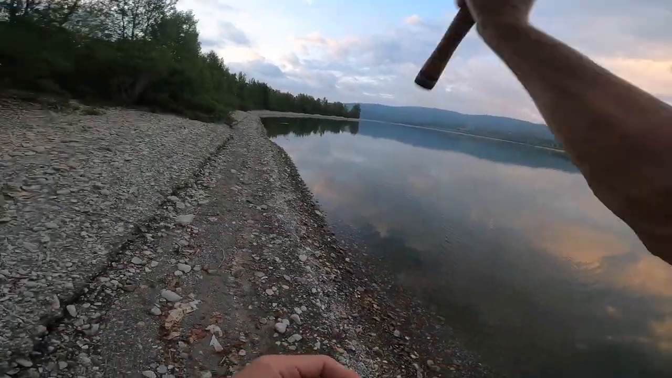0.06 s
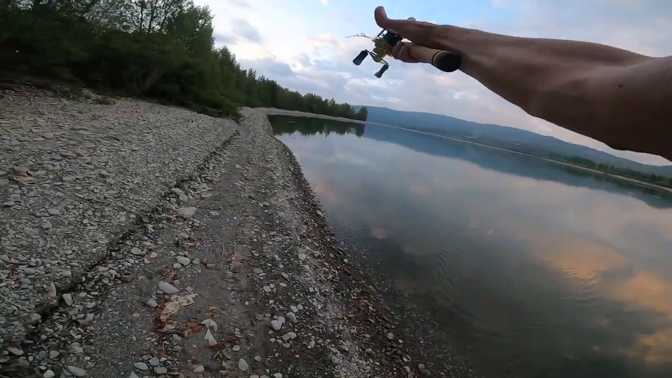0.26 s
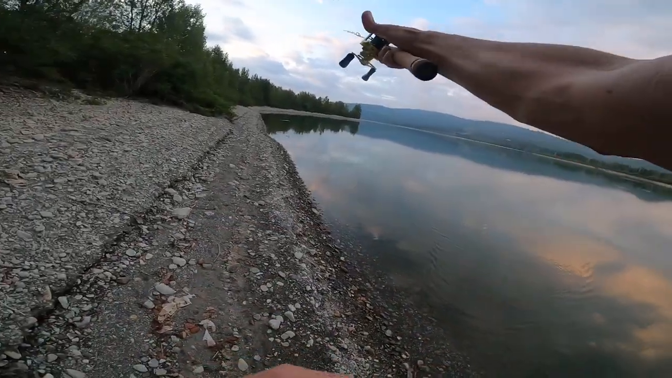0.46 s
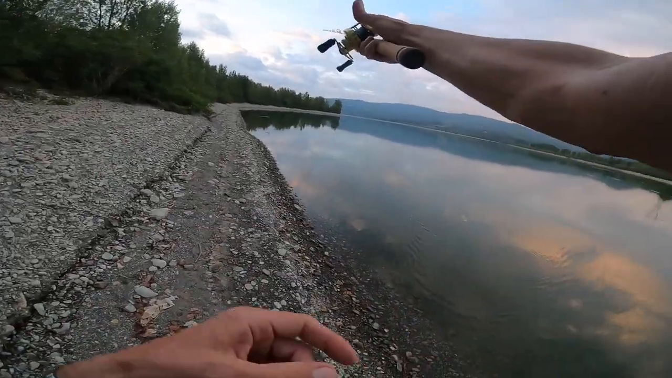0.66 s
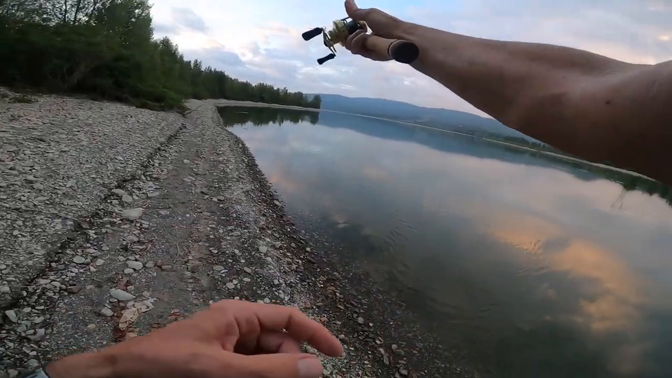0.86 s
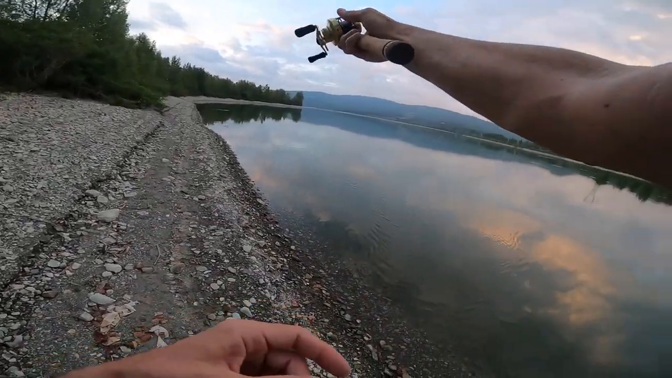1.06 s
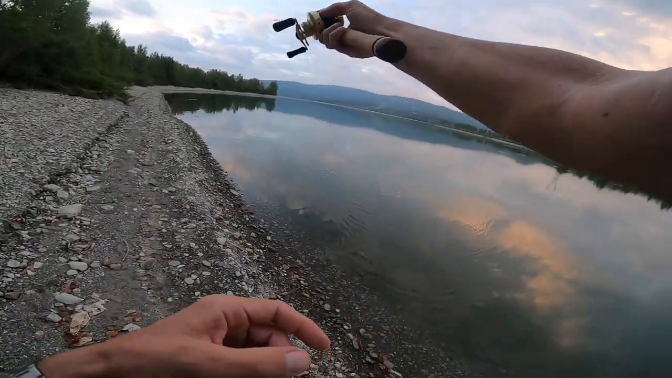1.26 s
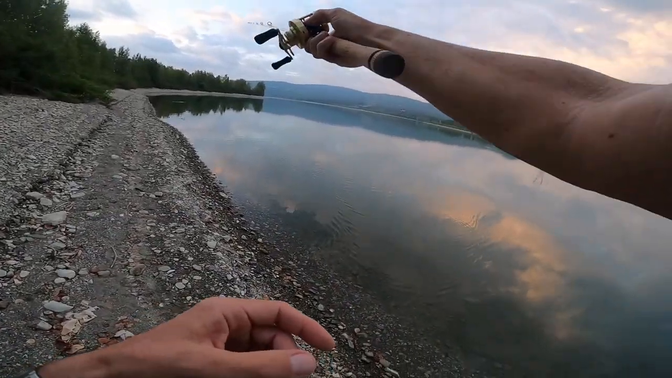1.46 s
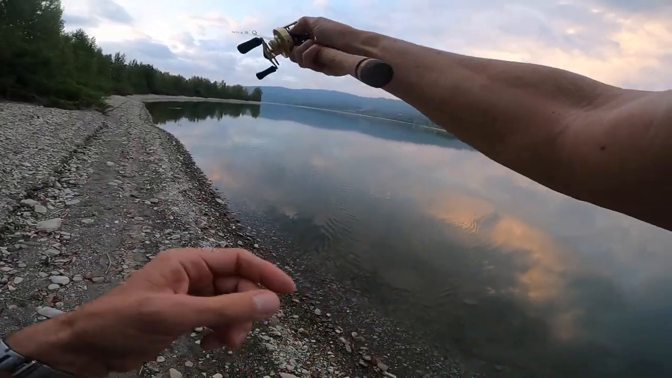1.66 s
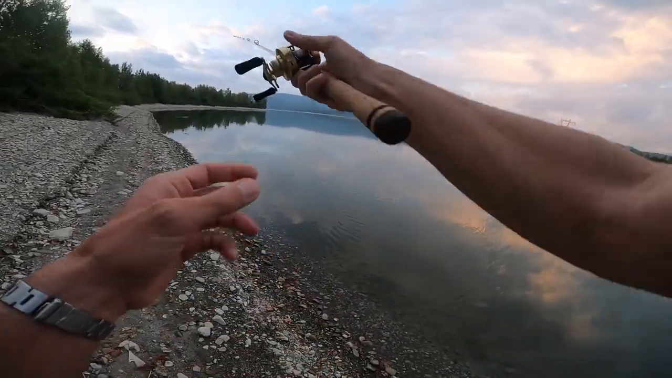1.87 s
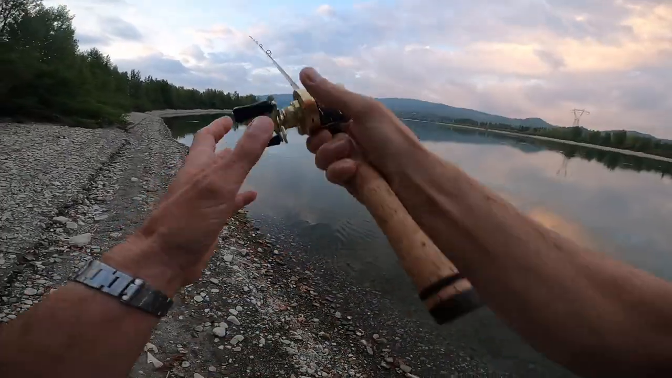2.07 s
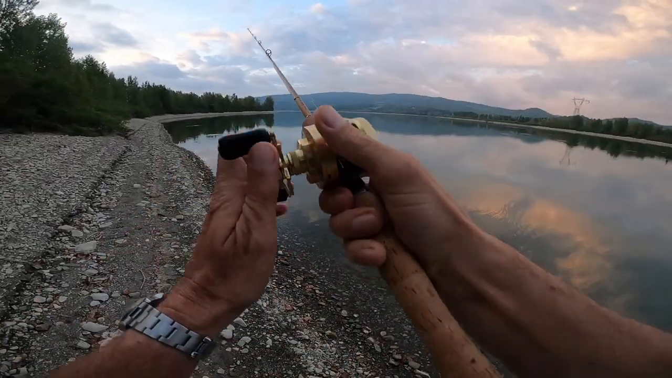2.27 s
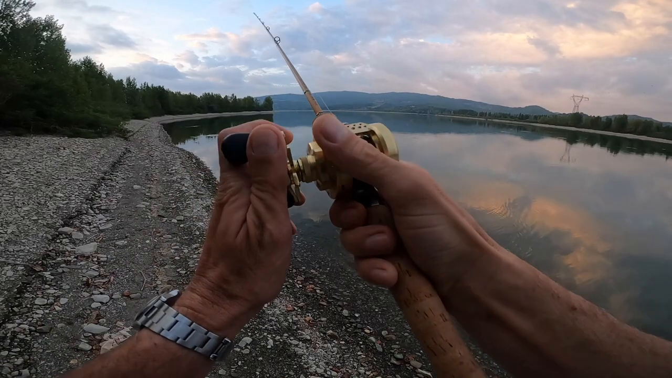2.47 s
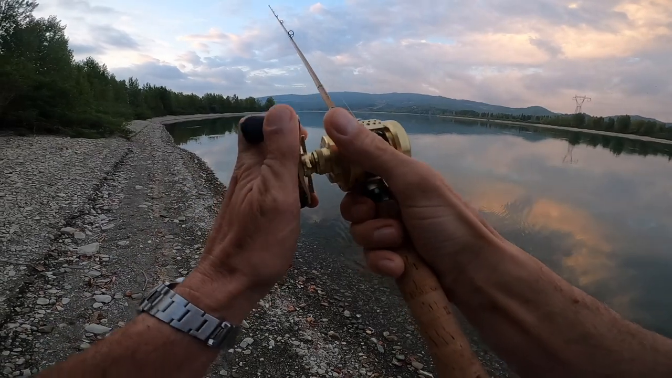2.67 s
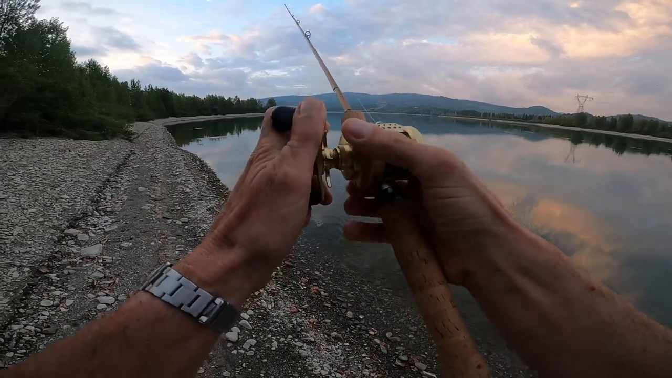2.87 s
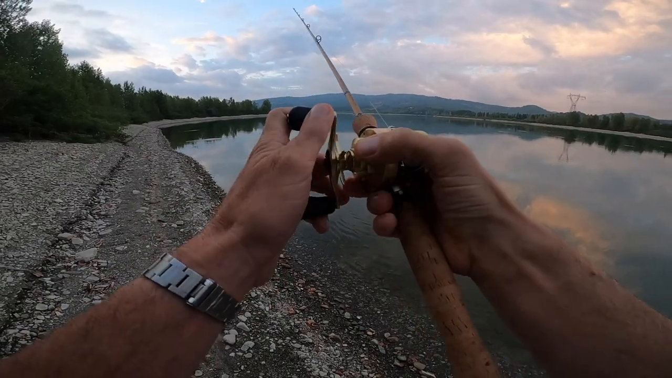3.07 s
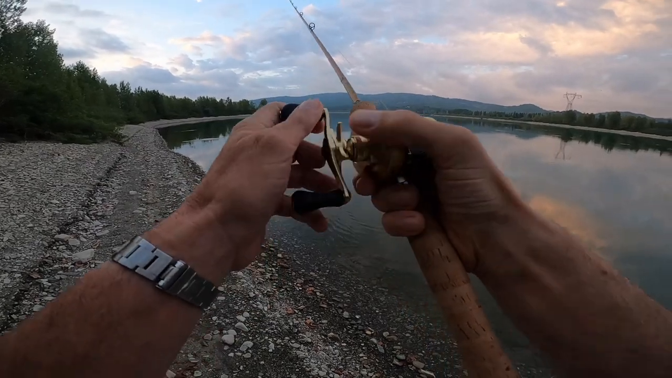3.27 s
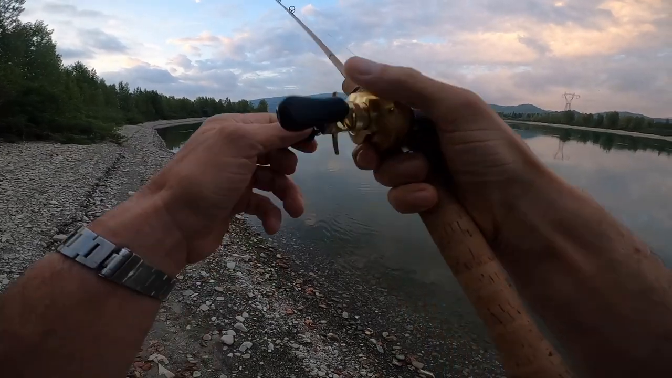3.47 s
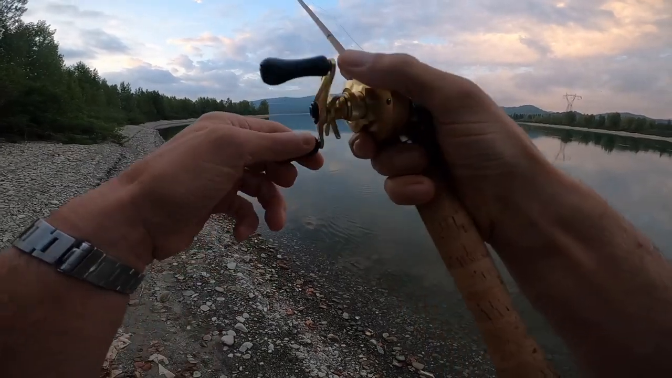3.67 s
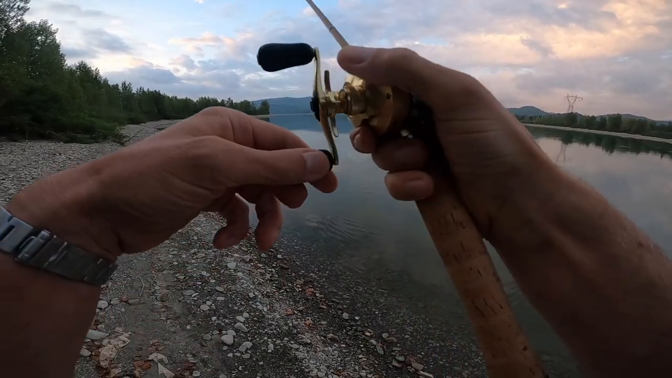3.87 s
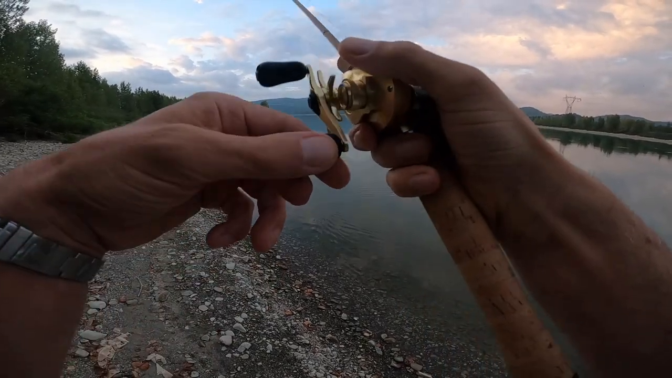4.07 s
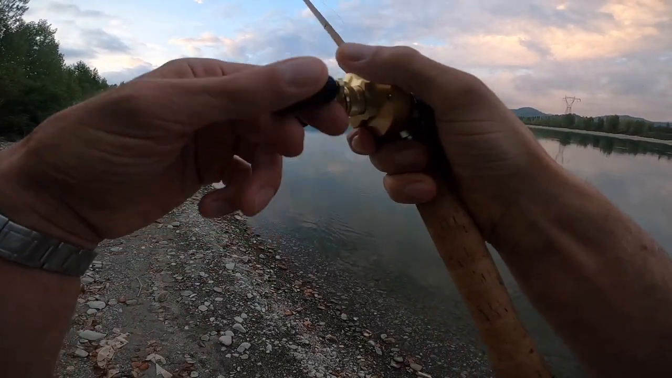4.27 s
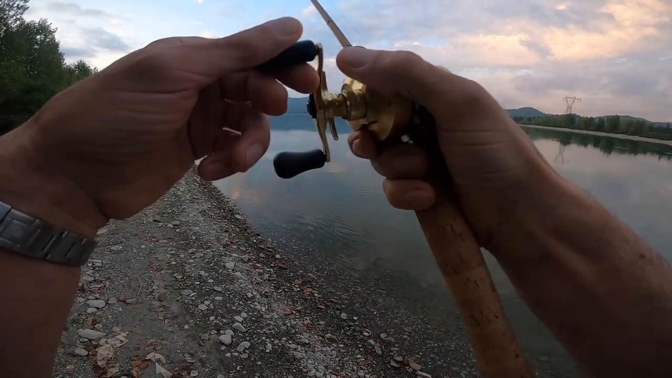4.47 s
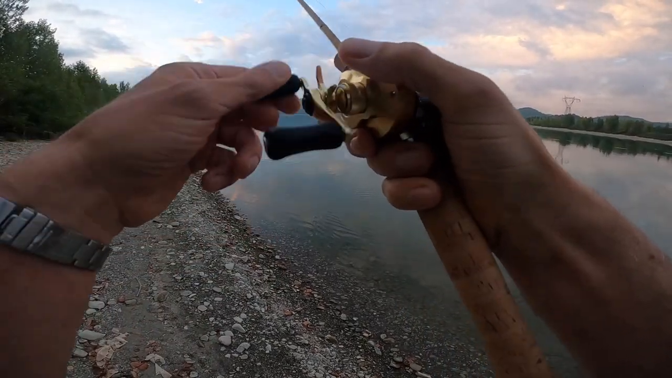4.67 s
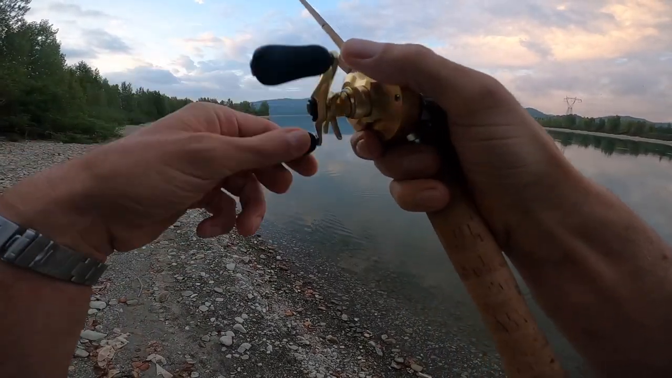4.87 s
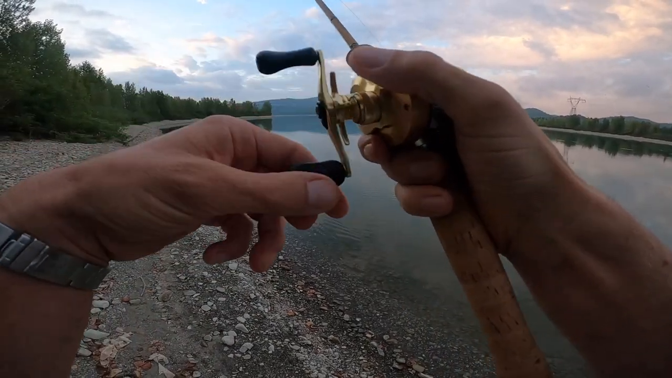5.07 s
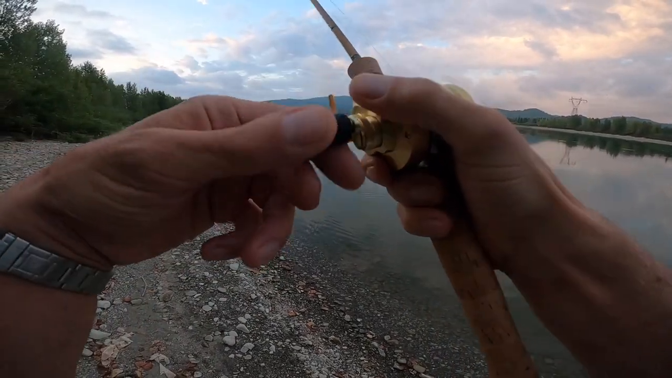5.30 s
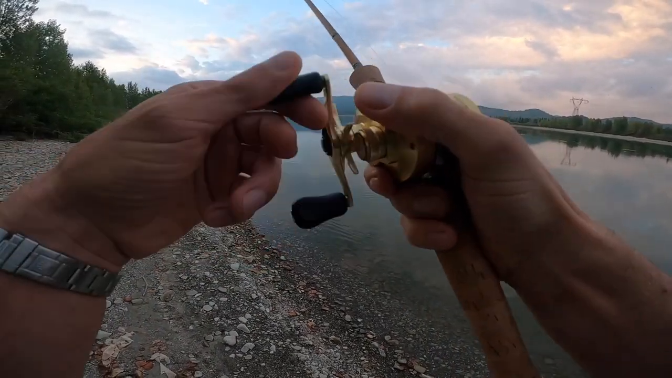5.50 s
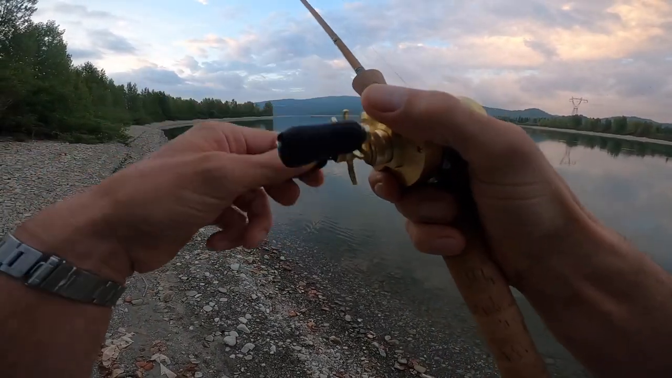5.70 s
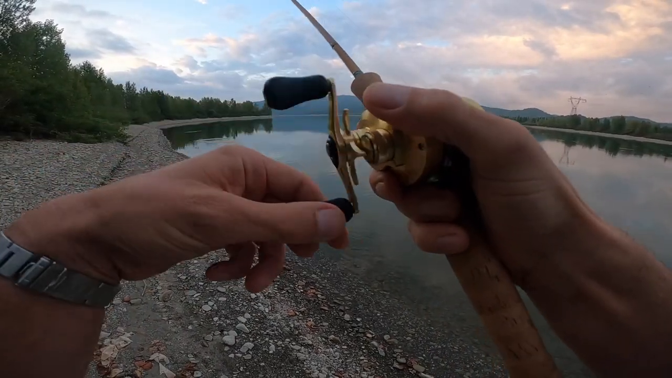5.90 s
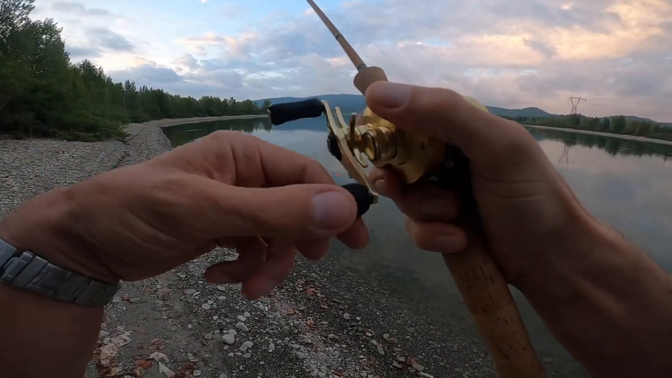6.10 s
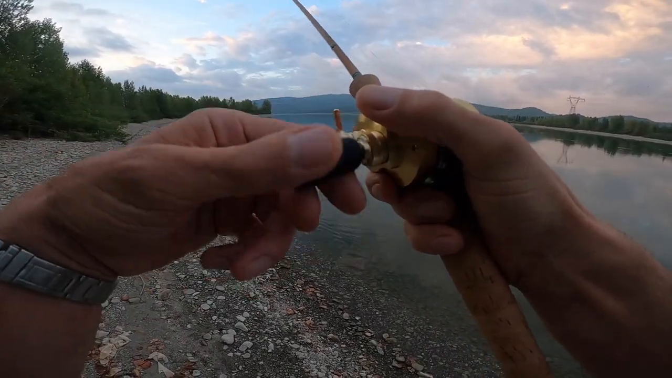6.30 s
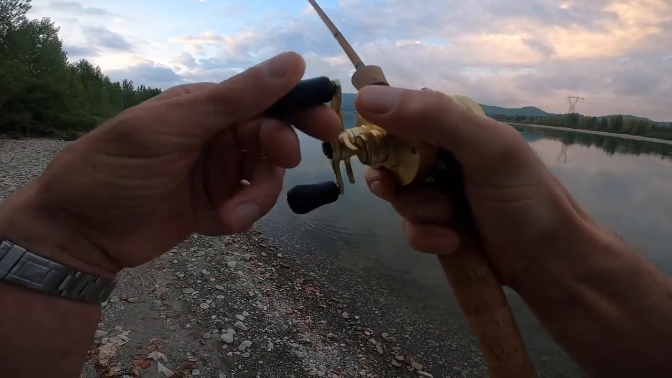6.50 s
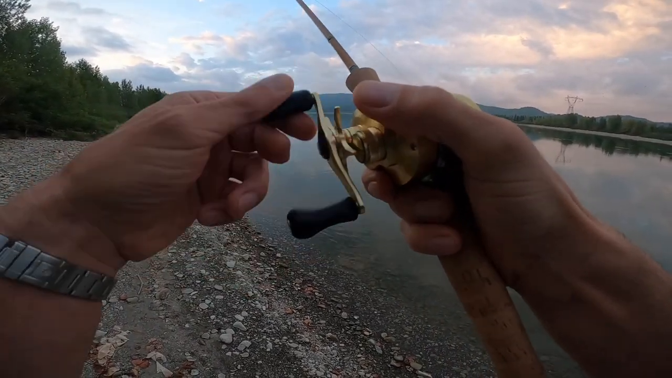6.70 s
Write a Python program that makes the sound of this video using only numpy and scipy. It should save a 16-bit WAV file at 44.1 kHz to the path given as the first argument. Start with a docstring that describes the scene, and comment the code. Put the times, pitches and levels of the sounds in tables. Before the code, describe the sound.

Close up on a calm pebble shore, a rod swishes with a knock and click, and line hisses out as the spool whirs, falling in pitch and fading over about a second and a half. Hands knock softly on the grip, metal clicks, then one loud dry snap engages the reel. Faint cranking follows, gears rubbing and wet line crackling, with small birds far off and low air rumble.

```python
"""A baitcasting reel is cast and wound close by: its free spool whirs as a comb of partials that sinks as it slows.
The rod swishes as air noise, the line hisses, and hands and metal contacts strike damped resonances.
The handle is then cranked softly: gears rub as patchy noise and wet line crackles as random grains.
Small birds call far off as gliding tones, over a low rumble of air on a calm pebble shore."""
import sys
import numpy as np
from scipy import signal
from scipy.fft import rfft, irfft, next_fast_len
from scipy.io import wavfile
from scipy.ndimage import uniform_filter1d, map_coordinates

SR = 44100
rng = np.random.default_rng(int(sys.argv[2]) if len(sys.argv) > 2 else 0)


def dump_mix(stems):
    """Bounce the given channels to the path in sys.argv[1] as a 16-bit WAV at rate SR."""
    frames = np.atleast_2d(stems).T  # one column per channel
    limited = np.clip(frames, -1, 1)  # hard clip at full scale
    pcm = np.round(limited * 32767).astype(np.int16)
    wavfile.write(sys.argv[1], SR, pcm)


N = 297507

# Levels are nominal, ahead of the balance of the two ports; spectra are relative.
# t60 is the time of a 60 dB decay.

# buffeting of air on the ports: (frequency [Hz], density [dB per Hz])
BUFFET = [(12, -14), (35, 1.5), (65, -3.5), (130, -19.5), (250, -34.5), (700, -91.5)]
# puffs of air on the ports: (middle [s], length [s], level [dB], lean to the right [dB])
PUFFS = [(0.166, 0.12, -39.5, 13), (.325, 0.19, -37.5, 8.5), (1.189, 0.23, -47.5, -0.5),
         (1.49, 0.083, -46.5, 4), (6.296, 0.079, -46.5, 3), (6.64, 0.073, -46.5, 7.5)]
# rumble of the open shore: (frequency [Hz], density [dB per Hz])
SHORE = [(50, -30), (100, -4), (200, -3), (560, -18), (880, -25.5), (1250, -20.5), (2300, -44.5),
         (5000, -79.5)]
STILL_AIR_DB, ARM_DRAUGHT_DB = -59, 11  # buffeting at rest; that of the winding arm, over the rub

# the rod's swing: (time [s], swish level [dB], line hiss level [dB])
SWING = [(.09, -63, -70), (.125, -42.5, -58.5), (.19, -41.5, -56.5), (.212, -34, -39), (.262, -34.5, -34.5),
         (.278, -51, -35.5), (.29, -55, -41), (.315, -41, -46), (.38, -53.5, -50.5)]
# swish of the rod: (frequency [Hz], density [dB per Hz])
SWISH = [(80, -10), (250, -7.5), (450, -14.5), (680, -10), (1200, -19), (2200, -20), (5000, -74)]
# hiss of line through the guides: (frequency [Hz], density [dB per Hz])
LINE = [(600, -14), (1200, -7.5), (4000, -6.5), (6200, -5.5), (8400, -27), (16000, -36)]

# dull knocks of hands on grip and knob: (time [s], nominal peak [dB], upper ring tilt [dB], rattle t60 [s])
KNOCKS = [(.037, -43, -2.5, 0.018), (.134, -26, -4.5, 0.038), (.164, -26.5, -14, 0.05),
          (.296, -16.5, -5.5, 0.018), (1.566, -41.5, -9, 0.013), (2.099, -36, -5.5, 0.069),
          (2.129, -41, -6, 0.056), (2.154, -28.5, -5.5, 0.032), (2.176, -36, -7, 0.046),
          (2.187, -35.5, -10, 0.09), (2.219, -30, -14.5, .03), (2.323, -29, -11, 0.12),
          (2.448, -35, -15.5, 0.022), (6.524, -33, 5.5, 0.16)]
# resonances of the rod and its grip: (centre [Hz], width [Hz], level [dB])
GRIP = [(293, 115, -7), (588, 93, -1.5), (702, 55, 0), (1080, 240, -6.5), (1730, 256, -1.5),
        (3600, 2650, -22)]
KNOCK_TICK_DB = -19.5  # bright tick of first contact before colouring, relative to the knock's nominal peak

# ticks of the handle in its play: (time [s], nominal peak [dB], chatter t60 [s])
HANDLE_PLAY = [(0.114, -42, 0.055), (0.496, -33, 0.032), (4.248, -45.5, 0.087), (4.795, -43.5, 0.1),
               (5.074, -44, 0.065), (5.354, -40, 0.16), (5.596, -38.5, 0.06), (5.714, -45.5, .08),
               (6.077, -45.5, 0.06)]
# ring of the handle: (frequency [Hz], density [dB per Hz])
HANDLE = [(400, -20), (1100, -3), (1450, -6.5), (1800, 0.5), (2400, -13), (7000, -37)]

# sharp metal contacts in the reel:
# (time [s], nominal peak [dB], body control [dB], treble control [dB], bounce level re contact [dB])
CLICKS = [(0.2954, -18.5, -7, -10, -23), (0.495, -25, 1, -16, -13), (1.79, -35.5, -10, 9, -9),
          (2.315, -26, 0, 5, -22), (2.3337, -17, -15, 8.5, -8), (2.6398, -14.5, -17.5, -8, -25.5),
          (2.6815, -2.5, -22.5, -25, -6.5), (2.6846, -11, -18.5, 0.5, -22), (2.8115, -37.5, 6, -16, -5),
          (2.842, -31.5, 4.5, -14, -8.5), (6.6887, -45, 10, -14.5, -23)]
# further metal contacts without a bounce, some of them part of the loud snap:
# (time [s], nominal peak [dB], treble control [dB])
SINGLE_CONTACTS = [(0.795, -44, -9), (2.540, -47, -4), (2.6341, -38, -14), (2.671, -30, -35),
                   (2.6903, -18.5, -32), (3.36, -47, 3), (4.4812, -46, 8), (4.7337, -44, -6),
                   (4.76, -45, -7)]
# modes of the reel's frame: (frequency [Hz], mean level [dB], t60 [s])
FRAME = [(2374, -10.5, 0.014), (2740, -5, 0.009), (3450, -5, 0.013), (3885, -3.5, 0.01),
         (5330, -16.5, 0.011), (6960, -17.5, 0.0077), (7370, -22, 0.022)]
# rattle of the reel's loose parts: (frequency [Hz], density [dB per Hz])
RATTLE = [(200, -15), (1200, -13.5), (2500, 1), (7200, 0), (8500, -13), (12000, -6), (15500, -31.5)]
# ringing of the rod, jolted as the gear catches: (frequency [Hz], level [dB], t60 [s])
JOLT = [(126, -35.5, 0.08), (511, -20, 0.01), (535, -38.5, 0.16), (1290, -46, .13), (11850, -55, .09)]
JOLT_AT_S, BOUNCE_S = 2.6842, 0.0108  # time of the jolt; flight of a contact's one bounce

# whir of the spool and running line: (time [s], level [dB])
SPOOL = [(.31, -50.5), (.45, -50.5), (.61, -58), (.9, -64.5), (1.1, -66.5), (1.33, -62.5), (1.66, -61.5),
         (1.8, -67.5), (1.99, -76)]
# slowing of the free spool as the line flies out: (time [s], speed [turns per s])
SPOOL_SPEED = [(.32, 326), (.45, 283), (.56, 234), (.8, 163), (1, 118), (1.3, 87), (1.87, 50)]
# resonances (and one dip) of the reel that the partials sink through: (centre [Hz], width [Hz], lift [dB])
SIDE_PLATE = [(1200, 110, 6), (3280, 380, 7.5), (6850, 300, -4)]
# line racing through the guides just after release: (frequency [Hz], density [dB per Hz])
RUSHING_LINE = [(750, -11), (1200, -5), (2250, 5.5), (2900, -2), (3550, -2.5), (4200, -8.5), (6000, 2.5),
                (8400, -25), (16000, -40)]
# the thinner whir that follows: (frequency [Hz], density [dB per Hz])
WHIR = [(500, -21), (1150, -10.5), (3400, -4), (4400, -6.5), (6000, -0.5), (7450, -2), (8600, -25),
        (13300, -17), (16000, -89)]
# span over which the rush gives way to the thinner whir: (start [s], end [s])
RUSH_ENDS = (.5, .78)
# whine in the whir, growing as the rush dies and fading as the spool runs down: (time [s], power share [0-1])
WHINE_SHARE = [(.65, .3), (.95, .5), (1.4, .55), (1.85, .15)]

# a far bird's thin sagging whistles: (time [s], start [Hz], level [dB])
WHISTLES = [(1.831, 6740, -68.5), (2.88, 6760, -68.5), (3.029, 6630, -67), (3.17, 6590, -74),
            (3.765, 7070, -71), (4.32, 6380, -74)]
WHISTLE_S, SAG_HZ_PER_S = 0.079, 1760  # length; mean rate of fall
# quick chirps that rise and level off: (time [s], length [s], start [Hz], rise [Hz], level [dB])
CHIRPS = [(3.004, 0.039, 5170, 600, -68), (3.108, .035, 5250, 650, -71), (4.31, .034, 2063, 1094, -65),
          (4.377, .05, 2580, 1580, -61.5), (4.458, 0.039, 3450, 720, -64)]
# held far calls: (time [s], length [s], frequency [Hz], level [dB])
CALLS_HELD = [(3.656, 0.19, 578, -72), (3.922, 0.12, 561, -64.5)]
# a thin wavering whistle: (time [s], frequency [Hz], level [dB])
WAVER = [(4.93, 3280, -70), (4.978, 3770, -65.5), (5.04, 3430, -72), (5.15, 3365, -71), (5.33, 3500, -73)]
GLIDE_BEND, OVERTONE_DB = 1.5, -11  # how early a glide is done; the octave of low notes

# single nudges of the handle that take up slack: (middle [s], length [s], rub level [dB])
NUDGES = [(2.22, 0.65, -63.5), (2.85, 0.56, -70), (3.45, 0.43, -71.5), (3.97, 0.12, -70.5)]
# steady winding: (time [s], gear and line rub level [dB])
CRANK = [(4.2, -65), (4.38, -71.5), (4.77, -65), (5.5, -67), (5.68, -61.5), (6.11, -69.5), (6.17, -81.5),
         (6.3, -83), (6.37, -71.5), (6.75, -68.5)]
# rub of the gears: (frequency [Hz], density [dB per Hz])
GEARS = [(700, -21.5), (1200, 2.5), (1750, -6.5), (3300, -1.5), (4300, -6), (5700, -2.5), (7400, -12),
         (8300, -28.5), (12200, -20.5), (16000, -50.5)]
# the fingers push the handle round in surges: time of one [s], spacing [s], swing either way [dB]
PUSH_AT_S, PUSH_EVERY_S, PUSH_DB = 4.6, 0.3106, 1.5
CRACKLE_PER_S, CRACKLE_DB = 480, -5.5  # grains of wet line on the spool; their level against the rub

# likeness of noise at the two ports: (frequency [Hz], coherence [0-1])
ALIKE = [(30, 0.4), (200, 0.55), (1200, 0.47), (7000, 0.13)]
# the right port's gain over the left: (frequency [Hz], level [dB])
PORT_BALANCE = [(30, 1.5), (125, 0.5), (1000, 2.5), (4000, -0.5), (8000, 1)]
PORT_LAG_S = 5e-5  # delay of the left port
TOP_HZ = 15600  # upper band limit


def amp(db):
    """Logarithmic level: decibels to amplitude gain."""
    return 10 ** (np.asarray(db) / 20)


def unit(x):
    """Mean power: scale to rms 1."""
    return x / np.sqrt(np.mean(x ** 2) + 1e-20)


def along(points, hz):
    """Logarithmic frequency scale: read (frequency [Hz], value) points along it."""
    f, v = np.transpose(points)
    return np.interp(np.log(hz + 1), np.log(f + 1), v)


def gains(rows, fade=0.014):
    """Amplitude envelope: a gain per sample for each dB column, decaying exponentially outside the rows' span."""
    s, *columns = np.transpose(rows)
    t = np.arange(N) / SR
    outside = np.maximum(0, np.maximum(s[0] - t, t - s[-1]))
    return [amp(np.interp(t, s, column)) * np.exp(-outside / fade) for column in columns]


def swells(rows):
    """Parabolic envelope: one smooth rise and fall for each (middle [s], length [s], level [dB]) row."""
    t = np.arange(N) / SR
    return sum(amp(db) * np.maximum(0, 1 - (2 * (t - s) / length) ** 2) for s, length, db in rows)


def wobble(rate, size=N):
    """Band-limited random modulation: a smooth curve with rate knots a second."""
    knots = rng.standard_normal(int(size * rate / SR) + 4)
    return map_coordinates(knots, [np.arange(size) * rate / SR])


def filtered(x, response):
    """Linear filtering: multiply the spectrum of x by a complex response of frequency."""
    n = x.shape[-1]
    padded = next_fast_len(n + 8192, True)
    return irfft(rfft(x, padded) * response(np.fft.rfftfreq(padded, 1 / SR)), padded)[..., :n]


def coloured(x, db_of_hz, size=2048):
    """Minimum phase: causal colouring, by a folded cepstrum, keeps an attack sharp."""
    cepstrum = irfft(np.log(amp(db_of_hz(np.fft.rfftfreq(size, 1 / SR)))))
    cepstrum[1:size // 2] *= 2
    cepstrum[size // 2 + 1:] = 0
    impulse_response = irfft(np.exp(rfft(cepstrum)))
    return signal.fftconvolve(x, impulse_response)[:len(x)]


def add(track, s, sound):
    """Superposition: mix a sound into the track at time s, cut at the track's end."""
    part = track[..., round(s * SR):][..., :sound.shape[-1]]
    part += sound[..., :part.shape[-1]]


def placed(x, right_db):
    """Interaural level difference: lean a sound towards the right port."""
    return x * amp([[-right_db / 2], [right_db / 2]])


def rush(spectrum, patchy_db):
    """Turbulent noise: partly coherent stereo of rms 1, with time-frequency patches of random gain."""
    z = signal.stft(rng.standard_normal((2, N)), nperseg=512)[2]
    field = rng.standard_normal(z.shape[1:])
    field = uniform_filter1d(uniform_filter1d(field, size=5, axis=0), size=10, axis=1)
    pair = signal.istft(z * amp(patchy_db * unit(field)), nperseg=512)[1][:, :N]

    def mid_and_side(hz):
        # the split of power between mid and side sets the coherence of the ports
        turn = np.arccos(np.clip(along(ALIKE, hz), -1, 1)) / 2
        return amp(along(spectrum, hz)) * [np.cos(turn), np.sin(turn)]

    mid, side = filtered(pair, mid_and_side)
    return unit(np.array([mid + side, mid - side]))


def winding():
    """Periodic drive: effort on the handle as a gain, in a few nudges and then steady turning in surges."""
    t = np.arange(N) / SR
    surge = amp(PUSH_DB * np.cos(2 * np.pi * (t - PUSH_AT_S) / PUSH_EVERY_S))
    return swells(NUDGES) + gains(CRANK, fade=0.03)[0] * surge


def air():
    """Flow noise: air stirred by the arms buffets each port in its own lumps, over shore rumble and hiss."""
    puffs = sum(placed(swells([(s, length, db)]), right_db) for s, length, db, right_db in PUFFS)
    arm = amp(ARM_DRAUGHT_DB) * winding()
    draught = np.sqrt(amp(STILL_AIR_DB) ** 2 + puffs ** 2 + arm ** 2)  # powers add
    lumps = unit(amp(1.2 * np.array([wobble(13), wobble(16)])))
    buffet = lumps * rush(BUFFET, patchy_db=1.5)
    swell = amp(.6 * wobble(3))
    rumble = swell * rush(SHORE, patchy_db=1.66) * amp(-58.0)
    # (frequency [Hz], density [dB per Hz])
    hiss_spectrum = [(300, -16.0), (1300, 2.5), (3500, -8.5), (6500, 0.0),
                     (8800, -20.5), (13000, -19.0), (15500, -39.0)]
    hiss = amp(-72.0) * rush(hiss_spectrum, patchy_db=3.0)
    return draught * buffet + rumble + hiss


def swing():
    """Aerodynamic noise: rod and sleeve cut the air; the line tears through the guides in flutters."""
    swish, hiss = gains(SWING, fade=0.092)
    flutter = amp(2.2 * wobble(170))  # shared by both
    rod = swish * unit(flutter * rush(SWISH, patchy_db=3.0))
    line = hiss * unit(flutter * rush(LINE, patchy_db=3.5))
    return placed(rod, right_db=3.0) + placed(line, right_db=0.5)


def knocks():
    """Resonant response: soft blows sound the hollow rod, a sum of damped resonances."""
    track, t = np.zeros((2, N)), np.arange(SR // 6) / SR

    def body(f):
        # alternate signs between neighbouring resonances
        return sum((-1) ** k * amp(db) * 1j * f * width / (centre * centre - f * f + 1j * f * width)
                   for k, (centre, width, db) in enumerate(GRIP))

    for s, db, bright_db, t60 in KNOCKS:
        noise = rng.standard_normal(len(t)) + .5 * rng.standard_normal((2, len(t)))
        blow = 0.19 * amp(-60 * t / max(t60, .005)) * noise
        blow[:, 0] += 1.5  # the impact itself
        tilt = [(250, -bright_db), (700, 1.5), (1600, bright_db), (3000, -6.5)]
        ring = np.array([coloured(port, lambda hz: along(tilt, hz)) for port in filtered(blow, body)])
        add(track, s, amp(db - 24.5) * unit(ring))
        tick = coloured(amp(-60 * t / 0.014) * rng.standard_normal(len(t)), lambda hz: along(GEARS, hz))
        add(track, s, amp(db + KNOCK_TICK_DB) * tick)
    return placed(track, right_db=3.5)


def handle():
    """Impact in a loose joint: the handle takes up its play with a thin tick and brief uneven chatter."""
    track, t = np.zeros(N), np.arange(SR // 6) / SR
    for s, db, t60 in HANDLE_PLAY:
        decay = 0.13 * amp(-60 * t / t60)
        chatter = decay * rng.standard_normal(len(t)) * amp(4 * wobble(400, size=len(t)))
        chatter[0] += 1  # the tick
        add(track, s, amp(db - 26.5) * unit(coloured(chatter, lambda hz: along(HANDLE, hz))))
    return track


def contacts():
    """Rebound: list every click with its one bounce, and the further contacts that have none."""
    blows = []
    for s, db, body_db, treble_db, bounce_db in CLICKS:
        blows.append((s, db, body_db, treble_db))
        blows.append((s + BOUNCE_S, db + bounce_db, body_db, treble_db))
    return blows + [(s, db, -15, treble_db) for s, db, treble_db in SINGLE_CONTACTS]


def jolt():
    """Modal decay: the catching gear shakes the rod, whose modes ring on with growing phase wander."""
    t = np.arange(SR // 6) / SR
    onset = 1 - np.exp(-t / BOUNCE_S)
    ring = np.zeros(len(t))
    for hz, level, t60 in JOLT:
        phase = 2 * np.pi * hz * t + onset * wobble(hz / 4, size=len(t))
        ring += amp(level - 60 * t / t60) * np.sin(phase)
    return ring


def clicks():
    """Impulse excitation: each contact rings the reel's frame and shakes its loose parts into a short rattle."""
    track, t = np.zeros((2, N)), np.arange(SR // 6) / SR
    # the rattle, then scatter from the shore
    shake = amp(-60 * t / .014) + amp(-34 - 60 * t / .19)
    for s, db, body_db, treble_db in contacts():
        ring = sum(amp(level + rng.normal(0, 1) - 60 * t / t60) * np.sin(2 * np.pi * hz * t)
                   for hz, level, t60 in FRAME)
        tilt = [(900, 0.74 * (body_db + 8.5)), (2200, 3.0), (4000, 1.0),
                (6500, 0.67 * (treble_db + 21.5)), (10000, -2)]
        noise = rng.standard_normal(len(t)) + 0.33 * rng.standard_normal((2, len(t)))
        rattles = [coloured(shake * port, lambda hz: along(RATTLE, hz)) for port in noise]
        ports = [coloured(.75 * ring + .8 * rattle, lambda hz: along(tilt, hz)) for rattle in rattles]
        add(track, s, amp(db - 28.0) * unit(np.array(ports)))
    add(track, JOLT_AT_S, jolt())
    return placed(track, right_db=1.5)


def spool_comb(size, count=90):
    """Harmonic series: the same rough rub each turn gives partials at multiples of the turning rate."""
    speed = np.interp(np.arange(size) / SR, *np.transpose(SPOOL_SPEED))
    angle = 2 * np.pi * np.cumsum(speed * (1 + .0007 * wobble(60, size=size))) / SR
    comb = np.zeros(N)
    step = 100  # samples for which a partial's strength holds
    for k in range(3, count):
        # each partial swells and fades as the line leaves different parts of the spool
        strength = amp(7.5 * np.tanh(wobble(5 * step, size=size // step))).repeat(step)
        partial = np.sin(k * angle + rng.uniform(0, 2 * np.pi)) * np.sqrt(speed)
        comb[:size] += strength * (k * speed < TOP_HZ) * partial
    return comb


def spool():
    """Source and filter: a comb of partials and a hiss pass through the reel's fixed resonances."""
    size, t = 2 * SR, np.arange(N) / SR
    comb = spool_comb(size)

    def lift(hz):
        return sum(db * np.exp(-((hz - centre) / width) ** 2) for centre, width, db in SIDE_PLATE)

    slowed = np.interp(t, RUSH_ENDS, (0, 1))
    share = np.interp(t, *np.transpose(WHINE_SHARE))
    whir = np.zeros((2, N))
    for colour, weight in [(RUSHING_LINE, 1 - slowed), (WHIR, slowed)]:
        whine = unit(filtered(comb, lambda hz: amp(along(colour, hz) + lift(hz))))
        whine *= np.sqrt(size / N)  # rms 1 over the comb's own span
        noise = filtered(rush(colour, patchy_db=1), lambda hz: amp(lift(hz) / 2))
        hiss = unit(amp(wobble(300)) * noise)
        whir += np.sqrt(weight) * (np.sqrt(share) * whine + np.sqrt(1 - share) * hiss)
    return gains(SPOOL)[0] * whir


def bird_voice(pitch):
    """Frequency modulation: a buzzy tone with a weak octave while it is low."""
    phase = 2 * np.pi * np.cumsum(pitch * (1 + .02 * wobble(500, size=len(pitch)))) / SR
    return np.sin(phase) + amp(OVERTONE_DB) * (pitch < 3700) * np.sin(2 * phase)


def birds():
    """Gliding tones and diffuse reflection: thin whistles with a strong diffuse scatter from the trees."""
    notes = [(s, WHISTLE_S, hz, -SAG_HZ_PER_S * WHISTLE_S, db) for s, hz, db in WHISTLES]
    notes += list(CHIRPS)
    notes += [(s, length, hz, 0, db) for s, length, hz, db in CALLS_HELD]

    times, waver_hz, waver_db = np.transpose(WAVER)
    waver_pitch = np.interp(np.arange(N) / SR, times, waver_hz)
    track = gains(np.transpose([times, waver_db]))[0] * bird_voice(waver_pitch)
    for s, length, start_hz, glide_hz, db in notes:
        u = np.linspace(0, 1, int(length * SR))
        pitch = start_hz + glide_hz * (1 - (1 - u) ** GLIDE_BEND)
        envelope = np.sqrt(2 * np.abs(np.sin(np.pi * u)))
        add(track, s, amp(db) * envelope * bird_voice(pitch))
    t = np.arange(SR // 2) / SR
    tail = rng.standard_normal((2, len(t))) * amp(-60 * t / 0.3)
    tail /= np.linalg.norm(tail[0])
    return track + amp(-1.5) * signal.fftconvolve(track[None], tail, axes=1)[:, :N]


def crank():
    """Friction noise: greased gears rub softly and wet line crackles onto the spool in random grains."""
    rub = unit(amp(2 * wobble(260)) * rush(GEARS, patchy_db=.8))
    struck = rng.random(N) < CRACKLE_PER_S / SR
    grains = struck * amp(5 * np.minimum(rng.exponential(size=N), 2.5))
    grains = grains * rng.normal(1, .6, (2, N))  # uneven between the ports
    crackle = unit(filtered(grains, lambda hz: amp(along(GEARS, hz)) * (hz > 500)))
    return winding() * (rub + amp(CRACKLE_DB) * crackle)


def scene():
    """Interaural delay: everything is a little right of centre, so the left port hears it later."""
    ports = air() + swing() + knocks() + handle() + clicks() + spool() + birds() + crank()

    def lag_and_lean(hz):
        lean = amp(along(PORT_BALANCE, hz) / 2)
        return np.array([np.exp(-2j * np.pi * hz * PORT_LAG_S) / lean, lean])

    return filtered(ports, lag_and_lean)


def record(dry):
    """Saturation and band limit: clip at full scale, then cut steeply above the top frequency."""
    return filtered(np.clip(dry, -1, 1), lambda hz: 1 / np.sqrt(1 + (hz / TOP_HZ) ** 120))


dry = scene()
out = record(dry)
dump_mix(out)
```